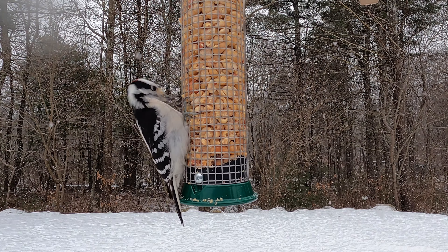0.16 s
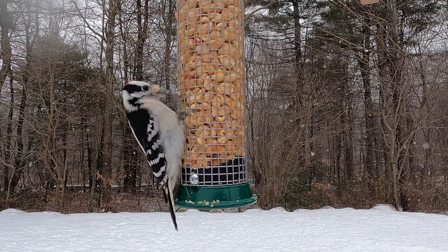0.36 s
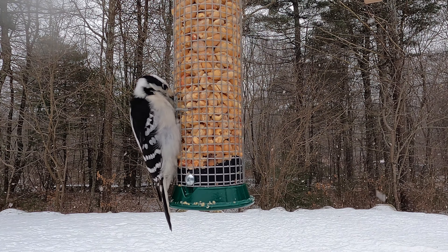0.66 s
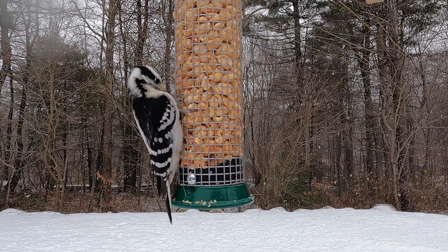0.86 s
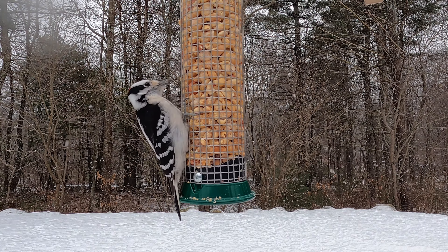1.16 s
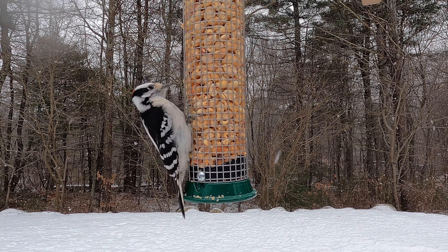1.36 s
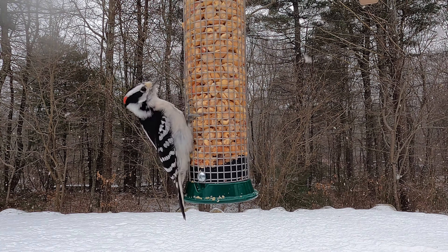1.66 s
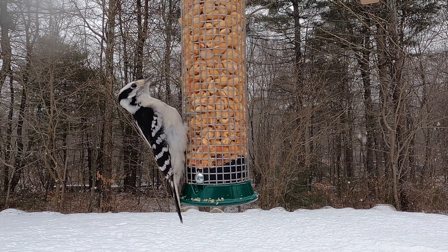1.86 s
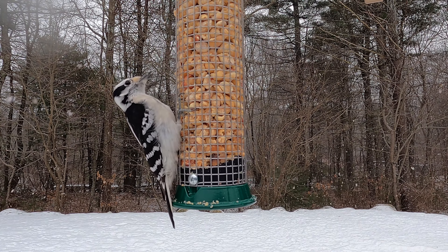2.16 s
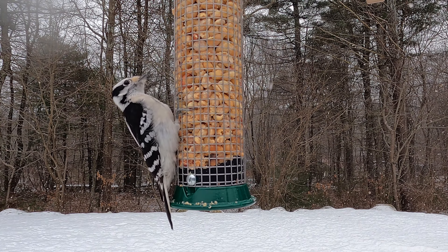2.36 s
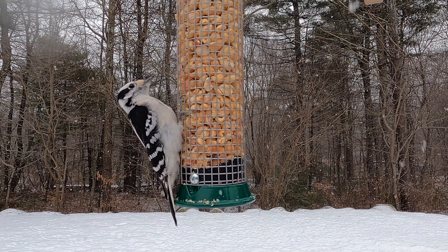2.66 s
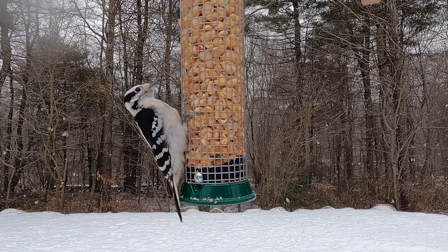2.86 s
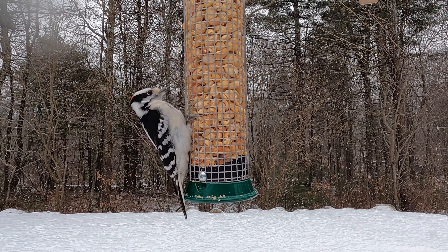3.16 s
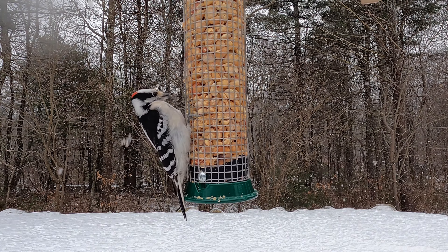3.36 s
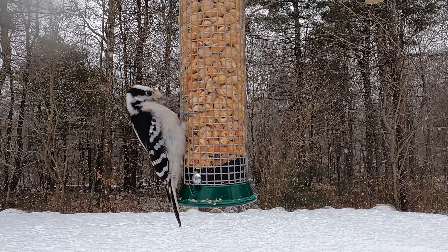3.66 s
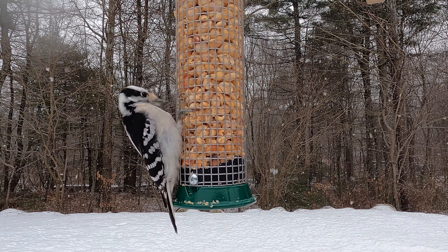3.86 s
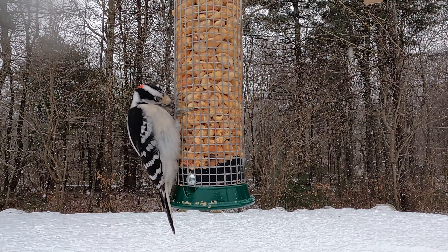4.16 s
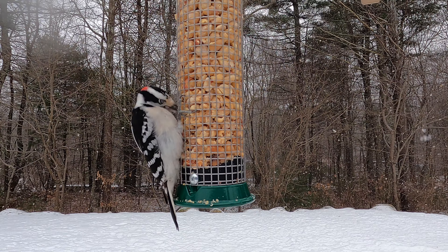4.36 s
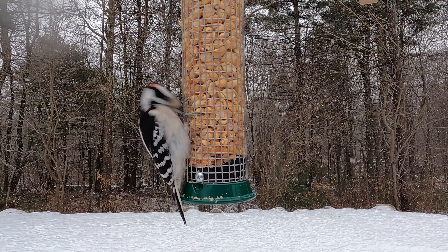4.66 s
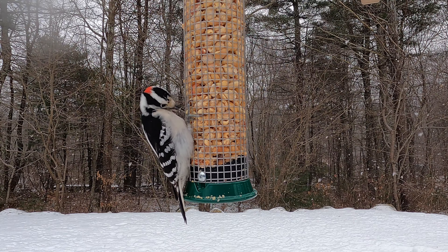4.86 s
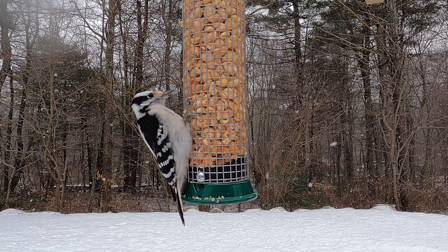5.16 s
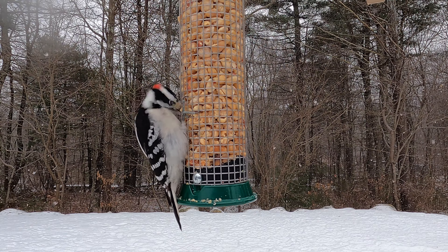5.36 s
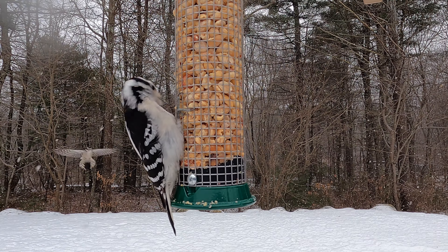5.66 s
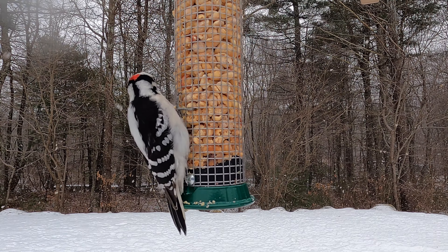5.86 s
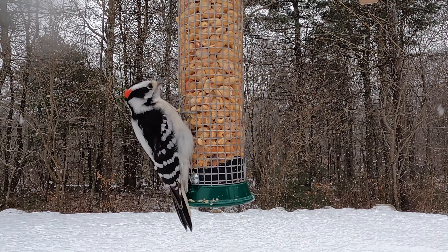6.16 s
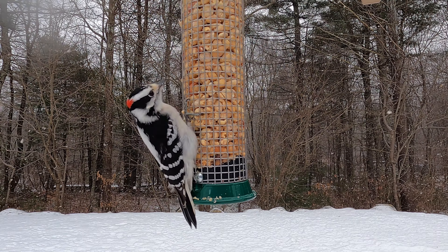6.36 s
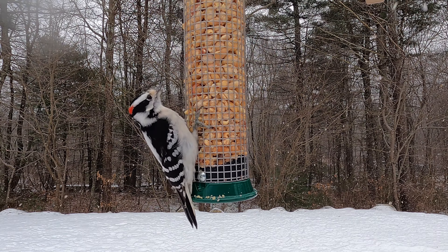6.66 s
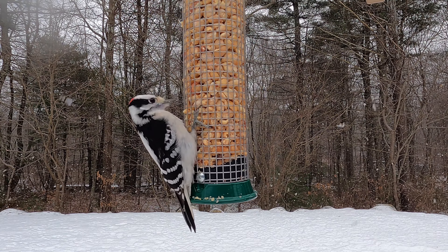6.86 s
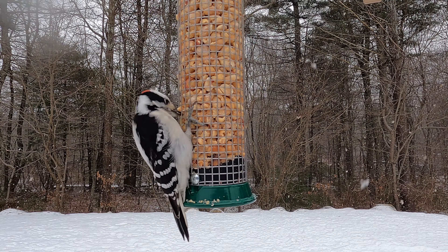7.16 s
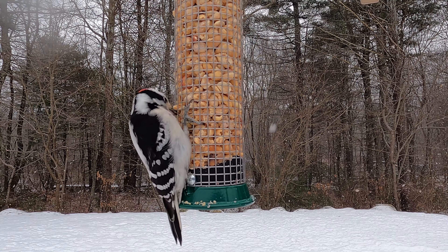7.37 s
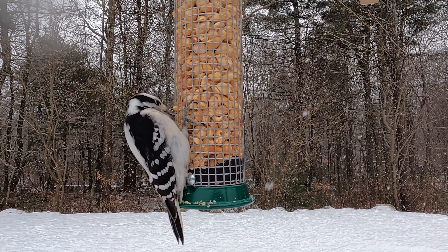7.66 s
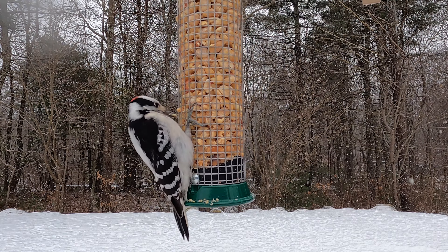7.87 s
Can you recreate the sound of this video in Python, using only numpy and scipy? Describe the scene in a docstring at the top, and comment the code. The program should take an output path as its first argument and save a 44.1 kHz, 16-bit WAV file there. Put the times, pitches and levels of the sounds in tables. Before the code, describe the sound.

Irregular sharp bill taps and crunchy scrapes on a mesh peanut feeder, with bright finch chips, a brief wing flutter, metallic rattles and low wind.

```python
"""Light scrapes and sharp bill taps come first: a small woodpecker works at peanuts in a wire feeder on a winter day.
Taps are noise bursts and a knock through nut resonances; scrapes are dense clicks that crunch and ring the mesh.
Finches chip, whine and twitter with gliding tones and narrow noise; a hoarse rasp sounds further off.
Another bird flutters in on puffs of noise and rattles a feeder nearby in clattering, ringing jolts.
Behind lie light wind rumbling on the microphone, the hush of the woods and a thin hiss, all shaped noise."""
import sys
import numpy as np
from scipy import signal
from scipy.fft import rfft, irfft, next_fast_len
from scipy.io import wavfile
from scipy.ndimage import uniform_filter1d

SR = 44100
rng = np.random.default_rng(int(sys.argv[2]) if len(sys.argv) > 2 else 0)


def store_pcm(level_fs):
    """Save levels as 16-bit WAV."""
    pcm = np.round(np.clip(level_fs, -1, 1) * 32767).astype(np.int16)
    wavfile.write(sys.argv[1], SR, np.atleast_2d(pcm).T)


N = 353461
T = np.arange(N) / SR
TOP_HZ = 13900  # upper limit of the sound


def undb(db):
    """Decibels to gain."""
    return 10 ** (np.asarray(db) / 20)


def unit(x):
    """Scale to rms 1."""
    return x / np.sqrt(np.mean(x ** 2) + 1e-20)


def add(out, s, x):
    """Mix x into out from time s on."""
    i = max(int(s * SR), 0)
    out[..., i:i + x.shape[-1]] += x[..., :N - i]


def freqs(x):
    """Frequency of each spectral bin of x, kept at 1 Hz or more."""
    return np.maximum(np.fft.rfftfreq(x.shape[-1], 1 / SR), 1)


def colour(x, points):
    """Filter by a spectrum of (f/Hz, level/dB) points."""
    hz, db = np.transpose(points)
    gain_db = np.interp(np.log(freqs(x)), np.log(hz), db)
    return irfft(rfft(x) * undb(gain_db), x.shape[-1])


def brighten(x, slope):
    """Tilt the spectrum about 3 kHz by slope dB per octave: harder contacts are brighter."""
    octaves = np.log2(np.clip(freqs(x), 600, 11000) / 3000)
    return irfft(rfft(x) * undb(slope * octaves), x.shape[-1])


def ring(x, modes):
    """Pass x through parallel resonances (f/Hz, width/Hz, level/dB)."""
    f = freqs(x)
    body = sum(undb(db) / (1 + 1j * (f * f - hz * hz) / (f * width)) for hz, width, db in modes)
    return irfft(rfft(x) * body, x.shape[-1])


def walk(rate, size):
    """Random wander that heads for a fresh value about rate times a second; rms near 2.8."""
    k = max(int(SR / rate), 1)
    steps = np.repeat(rng.standard_normal(size // k + 1), k)
    return 3.45 * uniform_filter1d(steps, k)[:size]


def grains(size, rate, spread_db):
    """Dense tiny clicks of uneven strength, rate per second."""
    hit = rng.random(size) < rate / SR
    strength_db = spread_db * np.minimum(rng.exponential(size=size), 3)
    return unit(hit * rng.standard_normal(size) * undb(strength_db))


def wide(points, side_db):
    """Steady stereo noise of a given spectrum: a shared middle plus an opposed side signal."""
    mid, side = (unit(colour(rng.standard_normal(next_fast_len(N)), points))[:N] for _ in range(2))
    return mid + undb(side_db) * side * np.array([[1], [-1]])


def place(x, pan_db, lag_ms, echo_db, t60):
    """The left ear hears a little late; deck and house wall scatter a thin echo that decays over t60 s."""
    t, size = T[:SR // 2], next_fast_len(N + SR // 10)
    scatter = colour(rng.standard_normal((2, len(t))), [(300, -12.5), (3000, 2.5), (12000, -11.0)])
    scatter = scatter * np.exp(-np.log(1000) * t / t60)
    scatter = scatter / np.sqrt(np.sum(scatter[0] ** 2))
    khz = np.fft.rfftfreq(size, 1000 / SR)
    late = irfft(rfft(x, size) * np.exp(-2j * np.pi * khz * lag_ms), size)[:N]
    direct = np.array([late * undb(pan_db / 2), x * undb(-pan_db / 2)])
    return direct + undb(echo_db) * signal.fftconvolve(x[None], scatter, axes=1)[:, :N]


# gusts: peak t/s, length/s, deepest heave level/dB, buffeting level/dB, rush of air level/dB before its gain
GUST_ARCHES = [(0.265, 0.27, -54, -49.5, -77), (0.87, 0.11, -44, -44.5, -82), (1.604, 0.065, -50, -41, -82),
               (1.758, 0.054, -46, -34, -56.5), (1.81, 0.15, -35.5, -40.5, -59.5),
               (1.95, 0.24, -34, -38.5, -57.5), (2.094, 0.28, -37, -43, -74),
               (2.518, 0.24, -43, -48.5, -71.5), (2.878, .25, -31, -36.5, -59.5),
               (4.132, 0.093, -45, -37, -69), (4.19, .13, -56, -48, -66), (4.56, 0.15, -39, -48, -85),
               (5.04, 0.18, -47, -48.5, -74), (5.637, 0.37, -46, -46, -70.5), (6.02, 0.44, -41, -42, -59.5),
               (6.258, 0.21, -49, -45.5, -59), (6.762, 0.36, -34.5, -46, -79),
               (7.103, 0.41, -41, -49.5, -73), (7.598, 0.26, -55, -51.5, -70)]


def gusts(column):
    """Gain of the gusts in one level column; each swells and dies as a smooth arch, and powers add."""
    power = 0
    for s, length, *levels in GUST_ARCHES:
        arch = np.cos(np.pi * np.clip((T - s) / length, -.5, .5))
        power = power + (undb(levels[column]) * arch) ** 2
    return np.sqrt(power)


# breeze between gusts, before the layer gains: t/s, low murmur level/dB, hush in the trees level/dB
BREEZE_LEVELS = [(0.0, -67, -73.5), (1.14, -65, -74.5), (1.74, -59, -67), (1.85, -67, -66.5),
                 (2.05, -63, -69), (2.5, -67, -76.5), (2.9, -60.5, -81.5), (3.17, -65.5, -74.5),
                 (3.81, -63.5, -79.5), (4.19, -59, -66), (4.32, -64.5, -67), (4.73, -64, -73),
                 (5.8, -58, -68), (5.95, -61.5, -67.5), (6.16, -59, -78), (6.69, -61.5, -66),
                 (7.05, -66, -70.5), (7.34, -64.5, -75), (7.54, -74, -62.5), (7.72, -62, -73),
                 (8.01, -64.5, -74.5)]
# spectrum of wind on the microphone: f/Hz, level/dB per Hz
RUMBLE_SPECTRUM = [(12, -16.5), (26, 4), (40, -2.5), (80, 0.5), (120, -6.5), (190, -15.5), (270, -27),
                   (400, -36), (900, -79)]
# spectrum of the hush in the trees: f/Hz, level/dB per Hz
HUSH_SPECTRUM = [(150, 7), (300, 2), (500, 0.5), (800, -6), (1200, 0), (2000, -8.5), (4000, -10.5),
                 (8000, -17.5), (13000, -29.5)]
# spectrum of the dull rush of air in a gust: f/Hz, level/dB per Hz
RUSH_SPECTRUM = [(150, 6), (500, 0), (800, -3), (1300, -2), (2500, -9), (5000, -17), (8000, -26),
                 (13000, -42)]
# spectrum of the thin hiss: f/Hz, level/dB per Hz
HISS_SPECTRUM = [(590, -31), (1000, -4.5), (1250, 4), (2390, -12), (3640, -11), (7460, -5), (9510, -22.5),
                 (11900, -12), (14000, -45)]
EDDY_DB = 0.8  # scale of the wind's quick unevenness
CALM_RUMBLE_DB = -50  # the deepest rumble between gusts


def outdoors(murmur_gain_db=17.5, hush_gain_db=4.5, hiss_db=-76, rush_gain_db=1):
    """Gusts heave, buffet and rush on the microphone, the trees hush, and a thin hiss lies under it all."""
    s, low_db, trees_db = np.transpose(BREEZE_LEVELS)
    rumble = wide(RUMBLE_SPECTRUM, -21)
    # level out the slow swells of the noise, then add quick eddies
    rumble = rumble / np.sqrt(uniform_filter1d(rumble[0] ** 2, SR // 5)) * undb(EDDY_DB * walk(11, N))
    heave, deep = (signal.sosfiltfilt(signal.butter(2, hz / (SR / 2), output="sos"), rumble)
                   for hz in (45, 130))
    # time shifts keep layers of the same noise from moving together
    calm = np.roll(deep, -SR, axis=1) * undb(CALM_RUMBLE_DB)
    buffets = np.roll(rumble - heave, SR, axis=1) * gusts(column=1)
    wind = calm + heave * gusts(column=0) + buffets
    murmur = np.roll(rumble - deep, 2 * SR, axis=1) * undb(np.interp(T, s, low_db) + murmur_gain_db)
    sway_db = .9 * walk(20, N)
    hush = wide(HUSH_SPECTRUM, -3.5) * undb(np.interp(T, s, trees_db) + hush_gain_db + sway_db)
    rush = wide(RUSH_SPECTRUM, -9) * gusts(column=2) * undb(rush_gain_db + EDDY_DB * walk(55, N))
    hiss = wide(HISS_SPECTRUM, -6.5) * undb(hiss_db + EDDY_DB / 2 * walk(5.7, N))
    return wind + murmur + hush + rush + hiss


# a hoarse rasp further off: t/s, length/s, start f/Hz, end f/Hz, width/Hz, level/dB
FAR_RASPS = [(1.678, .135, 1720, 1600, 220, -58), (1.688, .09, 1350, 1250, 260, -60),
             (1.765, .11, 1150, 750, 750, -58), (1.872, .19, 2850, 2650, 480, -58.5),
             (1.872, .19, 2130, 2080, 330, -58.5), (1.88, .17, 3900, 3800, 700, -68),
             (7.29, .15, 750, 900, 450, -69)]
# thin sizzling finch twitters: t/s, length/s, start f/Hz, end f/Hz, width/Hz, level/dB
SIZZLES = [(.1, 0.037, 5200, 6350, 400, -70.5), (.155, 0.073, 7100, 8400, 1700, -65),
           (.278, .028, 6500, 7600, 600, -68), (.53, .085, 8100, 8200, 1200, -64),
           (.92, .04, 5030, 5500, 1000, -71), (1.105, .05, 8500, 8200, 600, -71),
           (1.34, 0.098, 7350, 8130, 1700, -65), (3.74, 0.049, 5550, 5500, 450, -69),
           (5.43, .075, 7700, 7660, 350, -77), (5.8, .05, 8000, 8000, 350, -74)]


def rasps(rows, hoarse_db=0.3):
    """Hoarse, stuttering noise: a gliding carrier roughened by random amplitude and phase."""
    out = np.zeros(N)
    for s, length, start, end, width, db in rows:
        n = int(length * SR)
        grit = walk(width * 1.4, n) + 1j * walk(width * 1.4, n)
        tone = np.real(grit * np.exp(2j * np.pi * np.cumsum(np.linspace(start, end, n)) / SR))
        rough = unit(tone * undb(hoarse_db * walk(85, n)))
        fade = signal.windows.tukey(n, .25) * undb(np.linspace(2, -3, n))
        add(out, s, rough * fade * undb(db))
    return out


def voice(hz, octave_db, unrest, buzz, flicker_db=1.1, third_db=-14):
    """One side of the syrinx: an unsteady whistle whose overtones come and go; a fast buzz adds side tones."""
    n, buzz_hz = len(hz), 656
    phase = 2 * np.pi * np.cumsum(hz * (1 + unrest * walk(900, n) + .002 * walk(90, n))) / SR
    buzz_phase = 2 * np.pi * np.cumsum(buzz_hz * (1 + .06 * walk(300, n))) / SR
    phase = phase + buzz * np.sin(buzz_phase)
    # overtones above the upper limit stay silent; third_db comes on top of octave_db
    second, third = (np.sin(k * phase) * (k * hz < TOP_HZ) * undb(octave_db + flicker_db * walk(110, n))
                     for k in (2, 3))
    return np.sin(phase) + second + undb(third_db) * third


# clear finch chips: t/s, length/s, middle f/Hz, sweep/octaves, level/dB, second harmonic level/dB
CLEAR_CHIPS = [(0.172, .03, 3400, -.3, -71, -25), (0.42, 0.037, 3750, -0.3, -68, -25),
               (0.862, 0.05, 3770, -.42, -63, -29), (1.222, .036, 7250, -0.022, -66, -30),
               (1.545, 0.029, 3470, -.33, -63, -6), (1.664, 0.047, 3530, -0.21, -59, -20),
               (1.922, 0.05, 3400, 0.6, -47.5, -8.5), (2.3, 0.056, 3340, 0.51, -67, -10),
               (2.851, 0.036, 3140, 0.79, -49.5, -13), (2.884, 0.012, 3850, -0.066, -50, -29),
               (2.92, .017, 2110, 0.076, -56, -25), (3.105, 0.038, 3260, 0.56, -53, -23),
               (3.127, 0.016, 5740, -0.034, -57.5, -30), (3.41, 0.043, 3600, -0.43, -75, -25),
               (3.53, .06, 3500, -.35, -76, -27), (3.67, .05, 3430, -.3, -76, -29),
               (3.778, 0.051, 3086, 0.59, -47, -12), (3.915, 0.028, 7500, .17, -65, -30),
               (3.942, 0.046, 2750, 0.42, -56, -2), (4.005, 0.056, 3800, -.35, -67, -25),
               (4.347, .032, 7500, .1, -65, -30), (4.37, 0.045, 3800, -0.52, -35, -20.5),
               (4.488, 0.049, 3610, -0.55, -37.5, -21), (4.625, .042, 7750, .13, -88, -30),
               (6.639, 0.055, 3910, -0.51, -41.5, -12), (6.825, 0.064, 3590, -0.56, -59.5, -16),
               (7.228, 0.038, 7000, -0.71, -68, -30), (7.305, 0.025, 6600, -.35, -67, -30),
               (7.645, 0.053, 4090, -.45, -57, -26), (7.783, 0.035, 7600, 0.092, -65, -30),
               (7.803, 0.056, 3900, -0.51, -63.5, -19)]
# nasal two-voiced notes: t/s, length/s, middle f/Hz, sweep/octaves, level/dB,
# second harmonic level/dB, upper voice level/dB
NASAL_NOTES = [(0.722, 0.039, 2855, -0.34, -46.5, -15, -2), (4.249, .036, 2780, -0.37, -42, -8.5, -1.5),
               (6.524, .04, 2656, -0.36, -53.5, -9, 7.5)]


def syrinx(rows, unrest, buzz, voice_ratio=1.41, flutter_db=.8, bend=.08):
    """Short glides, each bent its own way; in two-voiced notes both sides of the syrinx sound, near a tritone apart."""
    out = np.zeros(N)
    for s, length, middle, sweep, db, octave_db, *upper in rows:
        n = int(length * SR)
        u = np.linspace(-.5, .5, n)
        hz = middle * 2 ** (sweep * u + bend * rng.standard_normal() * u ** 2)
        note = voice(hz, octave_db, unrest, buzz)
        if upper:
            note = note + undb(upper[0]) * voice(hz * voice_ratio, octave_db + 2, unrest, buzz)
        add(out, s, note * np.cos(np.pi * u) * undb(db + flutter_db * walk(215, n)))
    return out


# one drawn-out whine: t/s, lower voice f/Hz, upper voice f/Hz, lower voice level/dB, upper voice level/dB,
# second harmonic of the lower voice level/dB
WHINE_ARCH = [(1.336, 2140, 3760, -78, -82, -9), (1.352, 2350, 3830, -63, -54.5, 2),
              (1.385, 2820, 4050, -51.5, -55, -7), (1.416, 2925, 4310, -56.5, -55, -1.5),
              (1.446, 2970, 4370, -51, -57.5, -9), (1.484, 2806, 4200, -51.5, -64, -27),
              (1.512, 2785, 4100, -57.5, -83, -7), (1.53, 2850, 4040, -81, -88, -9)]


def whine(unrest=.003, flutter_db=.8, buzz=.5, clear_s=.1):
    """Two voices arch together, rough at first and then clear; the upper one leads and dies first."""
    out, (s, *columns) = np.zeros(N), np.transpose(WHINE_ARCH)
    t = np.arange(s[0], s[-1], 1 / SR)
    rough = np.clip(1 - ((t - s[0]) / clear_s) ** 2, 0, 1)
    low_hz, high_hz, low_db, high_db, octave_db = (np.interp(t, s, c) for c in columns)
    voices = (low_hz, low_db, octave_db, buzz / 3), (high_hz, high_db, -15, buzz)
    for hz, db, overtone_db, depth in voices:
        tone = voice(hz, overtone_db, unrest * (1 + rough), depth * rough, third_db=-20)
        add(out, s[0], tone * undb(db + flutter_db * walk(120, len(t))))
    return out


def finches():
    """Clear falling and rising chips, short buzzy nasal notes, thin sizzling twitters and one arched whine."""
    chips = syrinx(CLEAR_CHIPS, unrest=.005, buzz=0)
    nasal = syrinx(NASAL_NOTES, unrest=.005, buzz=.16)
    return chips + nasal + rasps(SIZZLES) + whine()


# small birds braking in the air: first wingbeat t/s, length/s, puff f/Hz, level/dB
WING_FLUTTERS = [(1.424, 0.3, 262, -58.5), (6.501, 0.25, 212, -46), (7.52, .12, 430, -58)]
# even wingbeats that grow weaker after the first few
WINGBEAT_HZ, WINGS_HOLD_S, WINGS_FADE_DB_PER_S = 25.14, 0.13, 61


def wings(width_hz=130):
    """Each downstroke is a soft low puff of air: noise through a doubled resonance."""
    out, n = np.zeros(N), int(0.022 * SR)
    for s, length, hz, level_db in WING_FLUTTERS:
        band = [(hz, width_hz, 0)]
        for since in np.arange(0, length, 1 / WINGBEAT_HZ):
            db = level_db - WINGS_FADE_DB_PER_S * max(since - WINGS_HOLD_S, 0)
            puff = unit(ring(ring(rng.standard_normal(n), band), band)) * np.hanning(n)
            add(out, s + since - n / SR / 2, puff * undb(db))
    return out


# jolts of the neighbouring feeder: t/s, level/dB, brightness/dB per octave, rise/s
JOLTS = [(6.134, -36.5, -0.4, 0.0016), (6.201, -34, 0, 0.0004), (6.228, -37.5, 0.5, 0.0044),
         (6.908, -50.5, 1, 0.013), (6.952, -45.5, 1.5, 0.0011), (7.005, -46.5, 2.5, 0.0019),
         (7.508, -47.5, 0, 0.0044), (7.537, -47, -4.5, 0.0073), (7.58, -57, -0.5, 0.0052)]
# spectrum of seeds and loose metal: f/Hz, level/dB per Hz
CLATTER_SPECTRUM = [(200, -4), (350, -6.5), (600, -7.5), (850, -8), (1500, -4.5), (2200, -8.5), (3600, -6),
                    (6000, -4), (8500, -11.5), (12500, -13), (14000, -29)]
# resonances of the feeder's metal hanger: f/Hz, width/Hz, level/dB
HANGER_MODES = [(403, 8, -2), (520, 12, -6), (651, 10, -2), (737, 9, -3), (1044, 9, 1), (1355, 14, 0),
                (1497, 18, 0), (1604, 10, 3), (2315, 10, -1), (2719, 14, -2), (5050, 16, -1),
                (6977, 25, -6), (9604, 20, -11), (11386, 16, -9)]


def rattles(t60_4khz_s=0.3, damping=0.4):
    """A jolt sets seeds and loose metal rattling in ragged spurts; the treble dies first."""
    out, t = np.zeros(N), T[:SR // 2]
    octave = np.log2(np.clip(freqs(t), 250, 16000) / 250)
    for s, db, slope, rise in JOLTS:
        clatter = grains(len(t), 16000, 1)
        metal = undb(-7) * unit(ring(clatter, HANGER_MODES))
        sound = rfft(unit(brighten(unit(colour(clatter, CLATTER_SPECTRUM)) + metal, slope)))
        spurts_db = .5 * walk(110, len(t)) * np.minimum(t / .03, 1)
        attack = 1 - np.exp(-t / max(rise, 1 / SR))
        for k in range(7):  # overlapping octave bands centred from 250 Hz to 16 kHz
            band = irfft(sound * np.maximum(1 - np.abs(octave - k), 0), len(t))
            life = t60_4khz_s * 2 ** (damping * min(4 - k, 2))
            band = band * undb(spurts_db + .4 * walk(70, len(t)))
            add(out, s, band * np.exp(-np.log(1000) * t / life) * attack * undb(db))
    return out


def knock(s=5.9605, level_db=-48):
    """One dull knock in three quick contacts, as the second bird comes in."""
    out, t = np.zeros(N), T[:SR // 10]
    contacts = ((.001, .5), (.0027, 1), (.0045, .4))  # t/s, strength
    push = sum(size * np.exp(-((t - at) / .0001) ** 2) for at, size in contacts)
    thud = unit(ring(push, [(560, 100, 0), (1040, 260, -3), (1650, 500, -13)]))
    add(out, s - .001, undb(level_db) * thud)
    return out


# spells of light nibbling: start t/s, end t/s, wire ring level/dB, crunch level/dB
NIBBLING_SPELLS = [(0.012, .12, -73, -74.5), (0.377, .53, -82, -74.5), (0.65, 1.0, -95, -75.5),
                   (1.112, 1.2, -73, -69.5), (3.72, 3.9, -79, -74), (4.957, 5.16, -73.5, -87),
                   (5.76, 5.88, -70, -72), (7.757, 7.95, -101, -78.5)]
# length of a stroke, time to the next, spread in strength
NIBBLE_S, NIBBLE_GAP_S, NIBBLE_SCATTER_DB = 0.12, .095, 2


def nibbles(slope=1.5):
    """Light strokes of the bill at an uneven pace, as rows like those of the distinct scrapes."""
    rows = []
    for start, end, wire_db, crunch_db in NIBBLING_SPELLS:
        starts = np.arange(start, end - NIBBLE_S / 2, max(NIBBLE_GAP_S, NIBBLE_S / 2))
        for s, (late, strength) in zip(starts, rng.standard_normal((20, 2))):
            db = NIBBLE_SCATTER_DB * strength
            rows.append((s + late * NIBBLE_GAP_S / 10, NIBBLE_S, wire_db + db, crunch_db + db, slope))
    return rows


# distinct scrapes of bill and claws: t/s, length/s, wire ring level/dB, crunch level/dB, brightness/dB per octave
SCRAPE_STROKES = [(0.24, 0.063, -60.5, -75, -6), (0.307, 0.1, -75.5, -89, -3),
                  (0.548, 0.11, -81, -66.5, 2.5), (1, 0.096, -67.5, -71, 6),
                  (1.226, 0.069, -68, -64.5, -3.5), (1.329, 0.11, -65.5, -70, 10),
                  (2.798, 0.16, -80, -71, 5), (3.072, 0.042, -74, -73, 8), (3.292, 0.12, -77, -78, 4),
                  (3.934, 0.11, -76.5, -73, 4), (4.02, 0.052, -87, -64, -10), (4.165, 0.11, -69, -59, -10),
                  (4.716, 0.08, -71, -72, -10), (4.872, 0.059, -68.5, -74, 0),
                  (5.085, 0.077, -75, -71, -6.5), (5.42, 0.056, -76, -65, -6),
                  (5.49, 0.061, -62.5, -60.5, -9), (5.591, 0.078, -64.5, -67.5, -7.5),
                  (5.679, 0.04, -57.5, -62, -3.5), (5.853, 0.16, -64, -66.5, 8),
                  (5.939, 0.044, -80, -53, -10.5), (6.063, 0.23, -61, -63.5, 7),
                  (6.546, 0.24, -72.5, -69.5, -3), (6.754, 0.03, -58.5, -68, -7),
                  (7.457, 0.022, -94, -65.5, -1)]
# spectrum of crumbling nut: f/Hz, level/dB per Hz
CRUNCH_SPECTRUM = [(400, -19.5), (1200, -3), (2000, -3.5), (3600, 3), (5500, 1.5), (7800, -4),
                   (9500, -10.5), (13500, -24)]
# resonances of the wire mesh, also stirred by the taps: f/Hz, width/Hz, level/dB
MESH_MODES = [(1960, 65, 0), (2120, 150, -8), (2730, 150, -14), (3600, 260, -17), (4040, 260, -19)]


def scrapes(rate=2800, jerk_db=1.3, grain_db=1.8):
    """Stick-slip of bill and claws: crumbs crackle and the wire sings."""
    crunch, wire = np.zeros(N), np.zeros(next_fast_len(N))
    for s, length, ring_db, crunch_db, slope in SCRAPE_STROKES + nibbles():
        n = int(length * SR)
        u = np.linspace(0, 1, n)
        # the stroke swells faster than it dies, in jerks
        stroke = np.sqrt(np.abs(np.sin(np.pi * u ** 0.48))) * undb(jerk_db * walk(124.7, n))
        slips = grains(n, rate, grain_db)
        crumbs = unit(brighten(colour(slips, CRUNCH_SPECTRUM), slope))
        add(crunch, s, unit(crumbs * stroke) * undb(crunch_db))
        add(wire, s, unit(slips * stroke) * undb(ring_db))
    mesh_gain = np.std(ring(rng.standard_normal(SR), MESH_MODES))
    return crunch + ring(wire, MESH_MODES)[:N] / mesh_gain


# bill taps: t/s, chatter of the contact/ms, level/dB over 10 ms, brightness/dB per octave,
# crumbling against the clean knock level/dB
BILL_TAPS = [(0.2211, 0.82, -43, -4, -17), (0.262, 1, -62, -6, 2), (0.4212, 0.45, -57, 7.5, -6),
             (0.531, 3, -53, -2, 8), (0.603, 6, -56.5, 3, 12), (0.6641, 3.8, -48, -0.5, 13),
             (0.682, 0.8, -59, 4, 0), (1.178, 0.39, -56.5, 1.5, -1), (1.251, 3.5, -66, -3, 2),
             (1.2852, 2.8, -56, -0.5, 11), (1.38, 1.5, -55, 10, 3), (1.69, 8.8, -48.5, -2.5, 19),
             (1.812, 1.5, -73, 2, 3), (1.869, 1.2, -64, 1, 2), (1.995, 2.5, -56, -2.5, 6),
             (2.491, .6, -72, 7, 0), (2.606, 2.5, -61.5, 10, 3), (3.311, 1.2, -68, 16, 3),
             (3.472, .6, -77, 6, 0), (3.948, 2.5, -55.5, -5.5, 8), (4.062, 2, -60.5, -1, 1),
             (4.148, 0.86, -55, -11, 5), (4.177, 3, -45, -4.5, 2), (4.372, 2.5, -43.5, -4.5, -2),
             (4.7132, 2.9, -43.5, -1, 8), (4.982, 2, -64, -11, 3), (5.018, 3.7, -64, 2, 9),
             (5.11, 2.7, -61, -6, 6), (5.127, 1.5, -64, -13, 3), (5.143, 1.7, -63, -2, 3),
             (5.405, 3, -47, -1.5, 8), (5.526, 7.6, -48, -9, 10), (5.537, 2, -58, -12, 3),
             (5.728, 2.1, -53, -1.5, 8), (5.8798, 0.54, -63, 9, 6), (6.007, 3, -56, -4, 6),
             (6.122, 4, -51, 16, 6), (6.5298, 2, -55, 1, 1), (6.632, 1, -56.5, 1, 3),
             (6.807, 0.64, -68.5, 3, 0), (7.172, 2.7, -50, -0.5, 4), (7.193, 0.87, -64, -2, 2),
             (7.46, 4.4, -65, -5, 10), (7.909, 4.5, -62.5, -2, 4)]
# resonances of a nut wedged in the mesh: f/Hz, width/Hz, level/dB
PEANUT_MODES = [(1450, 220, 10), (1860, 1400, 7.5), (4080, 1600, 7), (5200, 1240, 12), (7000, 1000, 4.5)]
# the give of the nut softens the contact: f/Hz, level/dB
CONTACT_SPECTRUM = [(500, 6), (1200, -2), (2200, 3), (3000, 2.5), (4200, -1.5), (8000, -2.5), (9500, -7),
                    (12000, -6), (14000, -14)]


def pecks(wire_db=-22, shift=0.057, linger=0.91):
    """The bill touches, cracks through to one hard contact and the nut crumbles on; each spot rings differently."""
    out, size, lead = np.zeros(N), 8192, 1024  # samples per tap, samples before the hard contact
    ms = (np.arange(size) - lead) / SR * 1000
    for s, chatter_ms, db, slope, crumble_db in BILL_TAPS:
        spread = max(chatter_ms, .3)
        crackle = (ms > -.55 * spread) * np.exp(-np.abs(ms) / (linger * spread))
        crackle = crackle + .08 * (ms > 0) * np.exp(-np.abs(ms) / 5)  # faint last crumbs
        push = rng.standard_normal(size) * np.abs(rng.standard_normal(size)) * crackle
        push = push * undb(crumble_db) / np.sqrt(np.sum(push ** 2))
        push[lead] -= 1  # the clean knock
        detune = np.exp(shift * rng.standard_normal(len(PEANUT_MODES)))
        spot = [(hz * d, width, mode_db) for (hz, width, mode_db), d in zip(PEANUT_MODES, detune)]
        nut = unit(brighten(colour(ring(push, spot), CONTACT_SPECTRUM), slope))
        tap = nut + undb(wire_db) * unit(ring(push, MESH_MODES))
        add(out, s - lead / SR, tap * undb(db) * np.sqrt(.01 * SR / size))
    return signal.sosfilt(signal.butter(3, 800 / (SR / 2), "high", output="sos"), out)


def scene():
    """The woods behind, other birds around, the feeder close by."""
    far = place(rasps(FAR_RASPS), pan_db=2.5, lag_ms=0.043, echo_db=-11.5, t60=0.046)
    song = place(finches(), pan_db=1.0, lag_ms=0.029, echo_db=-20.5, t60=0.42)
    visitor = place(rattles() + wings(), pan_db=-1.9, lag_ms=0.0063, echo_db=-10.5, t60=0.12)
    claws = place(scrapes(), pan_db=1.5, lag_ms=0.0083, echo_db=-4.5, t60=0.2)
    taps = place(pecks() + knock(), pan_db=.2, lag_ms=.018, echo_db=-18, t60=.06)
    return outdoors() + far + song + visitor + claws + taps


def record(dry):
    """A steep elliptic low-pass cuts the top."""
    return signal.sosfilt(signal.ellip(8, .2, 70, TOP_HZ, fs=SR, output="sos"), dry)


dry = scene()
out = record(dry)
store_pcm(out)
```